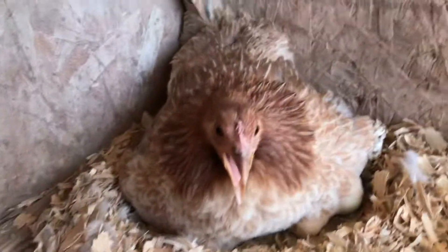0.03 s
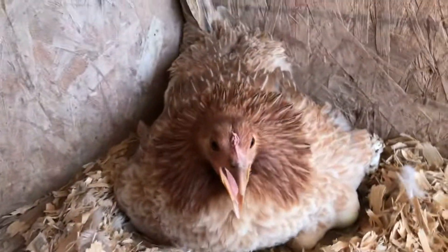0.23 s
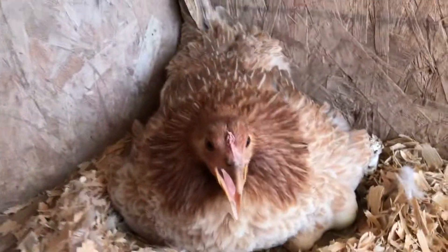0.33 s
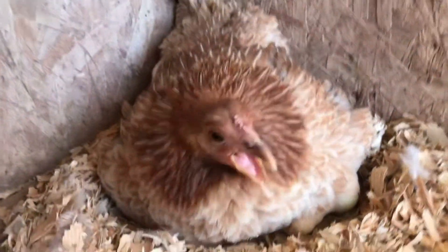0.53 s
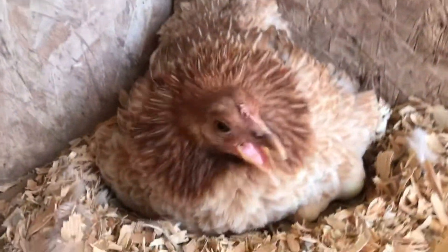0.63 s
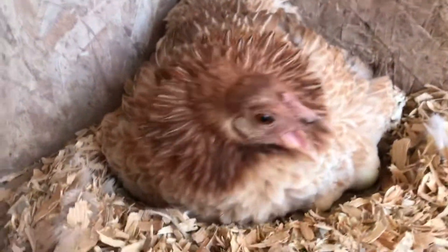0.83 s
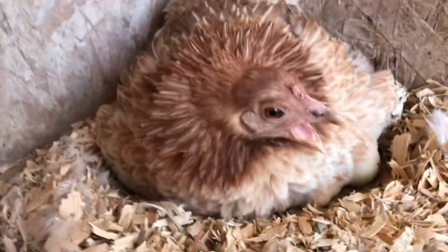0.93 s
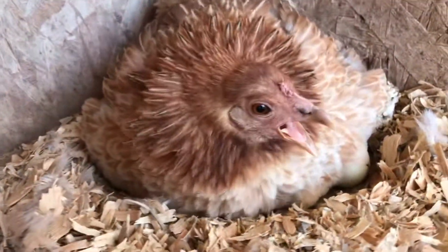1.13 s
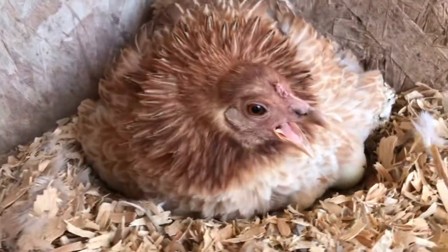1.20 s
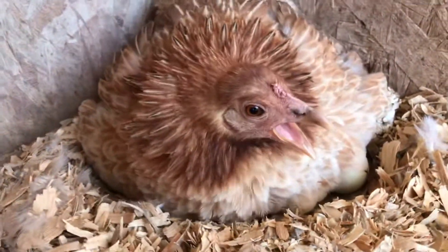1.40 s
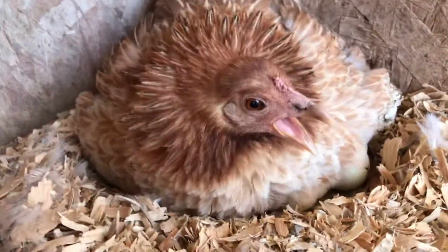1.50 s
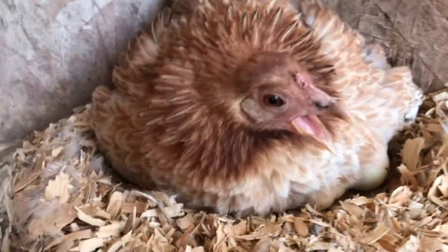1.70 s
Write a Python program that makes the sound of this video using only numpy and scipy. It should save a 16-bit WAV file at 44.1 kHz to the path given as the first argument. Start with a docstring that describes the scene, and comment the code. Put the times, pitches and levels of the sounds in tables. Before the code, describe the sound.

Close, slightly dull phone pickup of one hen in a wooden coop: a thin whine swells into a long cracked screech, a rough squawk bursts and wheezes out, then a low moan starts raspy and clears.

```python
"""A broody hen in a wooden nest box, close to a phone microphone, over the faint hush of the coop.
First a thin whine; from 0.22 s a long screech that breaks between clear whistle and rasp, with low croaks;
from 1.04 s a harsh squawk with a wheezy tail; from 1.37 s a softer low moan that starts raspy and clears.
The syrinx gives a stack of partials; where it turns chaotic they smear, and uneven pulses ring the throat.
The screech adds a growl near half pitch. Small ticks in the bedding and a short ring of the box surround it."""
import sys
import numpy as np
from scipy import signal
from scipy.fft import rfft, irfft
from scipy.io import wavfile
from scipy.ndimage import uniform_filter1d

SR = 44100
rng = np.random.default_rng(int(sys.argv[2]) if len(sys.argv) > 2 else 0)


def nominal_scale(level):
    """Amplitude ratio for a level in decibels (scalar or array-like)."""
    x = np.asarray(level, float) / 20
    return 10 ** x


def materialize(psi):
    """Save the field psi as 16-bit PCM at rate SR to the path in sys.argv[1].

    A 1-D psi becomes a single channel; in a 2-D psi each row is a channel.
    """
    bounded = np.clip(np.atleast_2d(psi).T, -1, 1)
    quanta = np.round(bounded * 32767).astype(np.int16)
    wavfile.write(sys.argv[1], SR, quanta)


N = 77175
T = np.arange(N) / SR


def follow(curve):
    """Straight lines through the (t/s, value) points of a curve, read at every sample."""
    t, value = np.array(curve).T
    return np.interp(T, t, value)


def band(x, hz, width_hz):
    """One resonance applied twice; width_hz is that of a single pass."""
    b, a = signal.iirpeak(hz, hz / width_hz, fs=SR)
    return signal.lfilter(b, a, signal.lfilter(b, a, x))


def unit(x):
    """Scale to rms 1."""
    return x / np.sqrt(np.mean(np.abs(x) ** 2))


def walk(rate_hz):
    """Smooth random wander of spread 1: noise kept below rate_hz."""
    sos = signal.butter(4, rate_hz, fs=SR, output="sos")
    settled = signal.sosfilt(sos, rng.standard_normal(2 * N))[N:]
    return unit(settled)


def hiss(hz, width_hz):
    """Air noise in one resonance, rms 1."""
    return unit(band(rng.standard_normal(N), hz, width_hz))


def grainy(curve, width_hz, steady):
    """A tone on a (t/s, f/Hz) curve whose size and phase tremble; rms 1."""
    turn = np.exp(2j * np.pi * np.cumsum(follow(curve)) / SR)
    tremble = (walk(width_hz) + 1j * walk(width_hz)) / 2
    return unit(np.imag((steady + tremble) * turn))


def controls(table):
    """Pitch and gains of one call for every sample; the gains are silent outside the call."""
    rows = np.array(table, float)
    t = rows[:, 0]
    inside = 1. * ((T >= t[0]) & (T <= t[-1]))
    inside = uniform_filter1d(inside, size=200, mode="nearest")
    pitch = np.interp(T, t, rows[:, 1])
    return pitch, [inside * nominal_scale(np.interp(T, t, column)) for column in rows.T[2:]]


# Chaos in the syrinx: t/s, roughness (0 clear, larger is more chaotic, up to 1.4)
ROUGHNESS = [(.1, .4), (.13, .5), (.19, .3), (.2, .1), (.235, .25), (.26, .6), (.275, .03), (.34, .03),
             (.355, .6), (.56, .6), (.58, .1), (.645, .08), (.66, .22), (.72, .3), (.73, .1), (.78, .38),
             (.86, .35), (.9, .2), (.93, .03), (1.04, .02), (1.05, .3), (1.07, .12), (1.095, .15),
             (1.11, 1.4), (1.4, 1.4), (1.44, .9), (1.453, .08), (1.475, .1), (1.49, .8), (1.535, .7),
             (1.55, .22), (1.735, .22), (1.745, .6)]


def roughness():
    """How chaotic the syrinx is at every sample."""
    return follow(ROUGHNESS)


SMEAR_HZ = 45  # rate of the smear, widened for higher partials
WAVER, FLUTTER_DB = .0015, 2.5  # rms pitch wander as a fraction; rms overtone flicker


def partials(pitch, pairs):
    """Partials (multiple, gain) of one oscillator; roughness trades each steady tone for a smeared one."""
    rough = roughness()
    phase = 2 * np.pi * np.cumsum(pitch * (1 + WAVER * walk(30))) / SR
    out = 0
    for k, gain in pairs:
        rate_hz = SMEAR_HZ * (1 + k / 3)
        smear = (walk(rate_hz) + 1j * walk(rate_hz)) / np.sqrt(2)
        share = np.clip(rough * (k / 2) ** .6, 0, 1)  # higher partials smear sooner
        flicker = nominal_scale(FLUTTER_DB * (k > 1) * walk(40))
        turn = (np.sqrt(1 - share ** 2) + share * smear) * np.exp(1j * k * phase)
        out = out + np.sqrt(2) * gain * flicker * np.imag(turn)
    return out


PULSE_JITTER, PULSE_SCATTER_DB = .25, 2  # spread of log spacing; spread of pulse level
BURST_HZ, BURST_DB = 70, 2.5  # rate and spread of the bursts


def rasp(gain, throat, rate_hz):
    """Uneven pulses, coming in bursts, ring the throat; rms 1 before the gain."""
    spacing, strength = rng.standard_normal((2, int(2 * rate_hz * N / SR)))
    at = np.cumsum(SR / rate_hz * np.exp(PULSE_JITTER * spacing)).astype(int)
    within = at < N
    pulses = np.zeros(N)
    pulses[at[within]] = nominal_scale(PULSE_SCATTER_DB * strength)[within]
    pulses = (pulses - pulses.mean()) * nominal_scale(BURST_DB * walk(BURST_HZ))

    def ring(x):
        """Throat resonances in parallel, with alternating sign."""
        out = 0
        for k, (hz, width_hz, db) in enumerate(throat):
            out = out + (-1) ** k * nominal_scale(db) * band(x, hz, width_hz) / np.sqrt(width_hz)
        return out

    return ring(pulses * gain) / np.std(ring(pulses))


# Spectrum of the coop's hush: f/Hz, relative level/dB
HUSH_SPECTRUM = [(35, -55), (70, -29), (200, -3), (500, -6), (1200, -9.5), (2500, -11), (6600, -15),
                 (7500, -27), (9750, -49), (16500, -120)]
HUSH_DB = -76  # rms level before a slow 1 dB drift


def hush():
    """Faint hush of the coop: noise shaped in frequency, drifting slowly in level."""
    f = np.maximum(np.arange(N // 2 + 1) * SR / N, 1)
    hz, db = np.array(HUSH_SPECTRUM).T
    shape = nominal_scale(np.interp(np.log(f), np.log(hz), db))
    noise = irfft(rfft(rng.standard_normal(N)) * shape, N)
    return unit(noise) * nominal_scale(HUSH_DB + walk(1.1))


# Thin whine: t/s, pitch f/Hz, level/dB of partials 1, 2, 4 and 6
WHINE_CALL = [(0.0, 846, -72, -73, -45.5, -86), (0.038, 852, -62, -86, -45, -77),
              (0.062, 846, -74, -76, -41, -82.5), (0.086, 878, -68.5, -78.5, -38, -75),
              (0.122, 871, -102, -80.5, -47, -78), (0.178, 919.6, -94.5, -74.5, -61.5, -65),
              (0.212, 892, -100, -91, -27, -91.5), (0.225, 855, -74, -60, -20, -63)]


def whine():
    """Thin opening whine of the syrinx, strongest on the fourth partial."""
    pitch, (first, second, fourth, sixth) = controls(WHINE_CALL)
    third, eighth = first * nominal_scale(-15.5), sixth * nominal_scale(-6.5)
    return partials(pitch, [(1, first), (2, second), (3, third), (4, fourth), (6, sixth), (8, eighth)])


# Small ticks in the bedding: t/s, starting level/dB, f/Hz
BEDDING_TICKS = [(0.119, -55, 7090), (0.128, -70, 237), (1.412, -49.5, 950), (1.42, -52.5, 905),
                 (1.449, -49, 152), (1.484, -51.5, 3660)]


def ticks():
    """Short damped sine clicks, decaying over 1.4 ms."""
    out = np.zeros(N)
    for s, db, hz in BEDDING_TICKS:
        age = np.maximum(T - s, 0)
        out += nominal_scale(db) * np.sin(2 * np.pi * hz * age) * np.exp(-age / 0.0014)
    return out


CATCH_HZ, CATCH_JITTER = 56, .35  # typical rate; spread of its logarithm


def catches():
    """0-1: brief, roughly regular moments when the membranes lose their beat."""
    beat = np.sin(2 * np.pi * np.cumsum(CATCH_HZ * np.exp(CATCH_JITTER * walk(25))) / SR)
    return 1 / (1 + np.exp(-7 * (beat + .35 * walk(30) - .35)))


# Long screech: t/s, pitch f/Hz, level/dB of partials 1, 2, 3 and 4, growl level/dB,
# rasp level/dB before roughness and catches scale it
SCREECH_CALL = [(0.221, 1146, -44.5, -57.5, -22.5, -75, -72, -33.5),
                (0.228, 1098, -22, -46.5, -55, -79, -53.5, -25),
                (0.25, 1049, -38.5, -75.5, -59.5, -73.5, -40, -29.5),
                (0.266, 1049, -52, -71, -71.5, -95.5, -68.5, -32.5),
                (0.277, 1035, -26, -70, -73, -65, -63, -33),
                (0.301, 1065, -27.5, -75, -44.5, -55.5, -69, -37.5),
                (0.325, 1110, -29, -53.5, -63.5, -64, -81.5, -52),
                (0.342, 1105, -28, -52, -45, -53, -72, -59),
                (0.355, 1110, -26, -72.5, -58.5, -95.5, -38.5, -35),
                (0.389, 1132, -28.5, -48.5, -40.5, -81.5, -47, -31.5),
                (0.501, 1153, -28, -57, -44.5, -72.5, -43, -31),
                (0.543, 1153, -33.5, -63, -33.5, -45, -50.5, -21.5),
                (0.571, 1168, -29.5, -70.5, -31, -45, -51, -26.5),
                (0.611, 1161, -28.5, -57.5, -29.5, -63.5, -75, -44.5),
                (0.623, 1250, -25, -37, -42.5, -53, -78, -51),
                (0.637, 1239, -21, -36, -34, -92, -83, -19.5),
                (0.653, 1241, -54, -52.5, -66, -82, -66, -39.5),
                (0.681, 1271, -24.5, -95, -80, -93, -66, -18),
                (0.722, 1250, -67, -86, -75, -90.5, -65.5, -48.5),
                (0.73, 1230, -27, -65, -54.5, -71.5, -50.5, -48),
                (0.765, 1179, -32, -67.5, -92, -87.5, -44, -50),
                (0.783, 1191, -31, -52.5, -32.5, -44, -75, -32.5),
                (0.809, 1155, -26.5, -64, -68, -50.5, -43, -34),
                (0.819, 1198, -29.5, -40.5, -46, -41, -54, -30),
                (0.857, 1152, -30.5, -35, -37, -54, -59, -36),
                (0.875, 1236, -32.5, -38.5, -26.5, -44.5, -87.5, -40),
                (0.901, 1230, -36, -43, -45, -74, -82, -42),
                (0.913, 1305, -34, -71.5, -71.5, -71, -90.5, -57),
                (0.933, 1332, -45, -69, -84, -83.5, -97, -80),
                (0.965, 1362, -31, -84.5, -74, -50.5, -94.5, -69),
                (0.99, 1376, -34.5, -73.5, -79.5, -56.5, -93.5, -73.5),
                (1.033, 1372, -34.5, -71.5, -85, -66.5, -92, -79),
                (1.047, 1373, -35.5, -68, -44, -60, -80, -35)]
# Throat resonances rung by its rasp: f/Hz, single-pass width/Hz, weight level/dB
SCREECH_RESONANCES = [(3398.5, 92, 7), (3694, 250, -2), (4149, 190, -8.5), (2464, 200, -16.5),
                      (950, 410, -9), (4270, 920, -26.5), (1670, 700, -33.5), (3256, 250, -5.5)]
# Steady growl near half the pitch: t/s, f/Hz
GROWL_CURVE = [(.245, 543), (.45, 575)]
# Single catches of the tone, each about 2 ms to either side: t/s, depth level/dB
TONE_BREAKS = [(.235, -5), (.743, -4), (0.771, -19), (.804, -24), (0.831, -9), (.874, -5)]
# Hiss past the beak: t/s, level/dB over the rasp
BEAK_HISS = [(.2, -43), (.6, -35.5), (.65, -59.5), (.76, -54), (.79, -20.5), (.88, -18), (.92, -31.5)]
CATCH_DB, CATCHES_END_S = -10, .6  # deepest catch of a rough tone; no regular catches after this time
OPEN_S, SHUT_S = 0.67, .9  # the beak opens wide between these times
AIR_DB = -38  # each band of air leaking around the tone, against partial 1


def screech():
    """The long call; when the tone catches, the growl runs on and the rasp swells."""
    pitch, (first, second, third, fourth, growl, grit) = controls(SCREECH_CALL)
    rough = roughness()
    caught = catches() * (T < CATCHES_END_S)
    held = nominal_scale(CATCH_DB * caught * np.clip(2.4 * rough - .2, 0, 1))
    held = held * nominal_scale(sum(db * np.exp(-((T - s) / 0.0022) ** 2) for s, db in TONE_BREAKS))
    opened = uniform_filter1d(1. * (T > OPEN_S) * (T < SHUT_S), size=400)
    fifth = np.sqrt(second * third) * nominal_scale(-30 + 21.4 * opened)  # stronger while the beak opens wide
    tones = partials(pitch, [(1, first * held), (2, second * held), (3, third),
                             (4, fourth * held), (5, fifth * held)])
    tones = tones + growl * grainy(GROWL_CURVE, width_hz=40, steady=.7)
    leak = first * nominal_scale(AIR_DB) * (hiss(1500, 500) + hiss(1900, 690))
    grit = grit * np.sqrt(rough) * nominal_scale(4.44 * caught + 1.0)
    beak = grit * nominal_scale(follow(BEAK_HISS)) * hiss(6450, 1100)
    return tones + leak + rasp(grit, SCREECH_RESONANCES, rate_hz=1100) + beak


# Low croaks where the voice breaks: t/s, length/s, level/dB at the height of the swell, f/Hz
CROAK_NOTES = [(0.662, 0.03, -36, 990), (0.667, 0.021, -45, 760), (0.698, 0.035, -47.5, 916),
               (1.15, 0.026, -45, 802)]


def croaks():
    """Short rough low notes, each a trembling tone under a half-sine swell."""
    out = 0
    for s, length, db, hz in CROAK_NOTES:
        swell = np.sin(np.pi * np.clip((T - s) / length, 0, 1))
        out = out + nominal_scale(db) * swell * grainy([(s, hz)], width_hz=50, steady=0.48)
    return out


# Harsh squawk: t/s, pitch f/Hz, level/dB of partials 1, 3 and 4,
# then level/dB of hiss, wheeze and rasp before their mixing factors
SQUAWK_CALL = [(1.035, 1264, -63, -86, -90.5, -64.5, -61, -73),
               (1.047, 1210, -43, -33, -75.5, -59.5, -50, -22),
               (1.057, 1139, -26.5, -44, -64, -49.5, -41.5, -19.5),
               (1.066, 1063, -30.5, -27.5, -39, -52.5, -57.5, -13.5),
               (1.079, 985.6, -22.5, -46, -15, -45, -44, -24),
               (1.097, 1004, -30, -54.5, -41, -44.5, -37.5, -18.5),
               (1.111, 1093, -39, -45.5, -50.5, -44, -54, -28.5),
               (1.129, 1128, -34, -48, -49.5, -40, -45.5, -39),
               (1.139, 1031, -43, -43, -52, -49.5, -54.5, -35.5),
               (1.149, 901, -63, -78, -50, -58, -59, -63), (1.162, 821, -40.5, -57, -53, -98, -60, -50),
               (1.187, 695, -68.5, -87.5, -101, -83, -65, -79),
               (1.239, 733, -85.5, -94.5, -100.5, -74.5, -55.5, -88),
               (1.313, 872, -84.5, -106, -97, -100, -73.5, -104.5)]
# Throat resonances rung by its rasp: f/Hz, single-pass width/Hz, weight level/dB
SQUAWK_RESONANCES = [(3400, 100, 8), (4005, 147.3, -7), (640, 250, -22), (3890, 200, 3.5),
                     (3162, 130, -1.5), (2471, 50, -12.5), (1036.3, 510, -13.5), (6347, 340, -10),
                     (1950, 390, -19)]
# Air in the windpipe, sagging after the squawk: t/s, f/Hz
WHEEZE_CURVE = [(1.2, 1492), (1.31, 1278)]


def squawk():
    """Loud harsh burst whose pitch falls unevenly, its tone dissolving into breath, then a wheeze."""
    pitch, (first, third, fourth, spit, air, grit) = controls(SQUAWK_CALL)
    wheeze = grainy(WHEEZE_CURVE, width_hz=54, steady=0) + 0.47 * hiss(1200, 490)
    spray = hiss(4900, 1100) + nominal_scale(-8.0) * hiss(6880, 480) + nominal_scale(-3) * hiss(1800, 1397)
    broken = np.clip(roughness() - .4, 0, .8)  # the tone dissolves into breathy noise
    tone = first * np.sqrt(1 - broken ** 2)
    breath = first * broken * hiss(1080, 450)
    tones = partials(pitch, [(1, tone), (1.5, tone * nominal_scale(-26)), (3, third), (4, fourth)])
    harsh = rasp(grit * nominal_scale(-0.5), SQUAWK_RESONANCES, rate_hz=1600)
    return tones + air * wheeze + spit * spray + breath + harsh


# Soft moan: t/s, pitch f/Hz, level/dB of partials 1, 2, 3 and 5 (6 and 7 share the last),
# low tone level/dB, rasp level/dB
MOAN_CALL = [(1.37, 736.4, -87.5, -82, -100, -89, -87, -73.5),
             (1.396, 745.3, -75, -68, -87.5, -103, -96, -77.5),
             (1.416, 794.6, -61.5, -102.5, -93.5, -80, -81.5, -68),
             (1.426, 752.5, -113, -104.5, -93.5, -82, -99, -103.5),
             (1.446, 761, -84.5, -63.5, -100, -90.5, -88, -43),
             (1.456, 805, -44.5, -46, -68, -73, -61, -48.5), (1.47, 786, -47, -44.5, -75.5, -99, -74, -69),
             (1.48, 750.5, -86, -54.5, -85.5, -73, -86, -49),
             (1.498, 769.4, -67, -53, -101, -86.5, -51.5, -45.5),
             (1.506, 720, -49, -59, -83.5, -79, -52, -42.5),
             (1.522, 850, -59.5, -48, -88.5, -85, -51.5, -45.5),
             (1.54, 852.4, -42, -49, -72, -79, -63, -47.5),
             (1.562, 835, -53.5, -51.5, -75.5, -81, -72, -102),
             (1.598, 842, -49, -56.5, -70.5, -85, -92, -83),
             (1.62, 838, -48, -53.5, -61.5, -79, -82.5, -81.5),
             (1.674, 823, -47, -55, -74, -78.5, -96, -81), (1.722, 829, -48, -51, -71, -79, -93.5, -89),
             (1.728, 798, -45, -52, -62.5, -75.5, -99, -58), (1.75, 850, -65, -58, -75.5, -85.5, -82, -41)]
# Throat resonances rung by its rasp: f/Hz, single-pass width/Hz, weight level/dB
MOAN_RESONANCES = [(1250, 260, 10.5), (1710, 860, -15), (778, 150, 2), (2920, 990, -16.5),
                   (5500, 4100, -25)]
LOW_HZ = 539.5  # low tone under the raspy start


def moan():
    """Soft low call of the syrinx that starts raspy, over a low tone, and clears."""
    pitch, (first, second, third, upper, low, grit) = controls(MOAN_CALL)
    tones = partials(pitch, [(1, first), (2, second), (3, third), (5, upper), (6, upper), (7, upper)])
    tones = tones + low * grainy([(0, LOW_HZ)], width_hz=40, steady=1)
    return tones + rasp(grit, MOAN_RESONANCES, rate_hz=300)


BOX_T60_S, BOX_DB = .1, -24  # time to decay by 60 dB; level of the ring against the hen


def nest_box(hen):
    """Short ring of the wooden box: decaying noise that begins 2 ms after the direct sound."""
    age = T[:SR // 4]
    tail = rng.standard_normal(len(age)) * np.exp(-np.log(1000) * age / BOX_T60_S) * (age > .002)
    tail = tail / np.sqrt(np.sum(tail ** 2))
    return nominal_scale(BOX_DB) * signal.fftconvolve(hen, tail)[:N]


RUMBLE_DB, RUMBLE_HZ = -46, 292  # level against the voice's envelope; upper limit


def rumble(hen):
    """A low rumble that follows the loudness of the voice."""
    envelope = uniform_filter1d(np.abs(hen), size=400)
    return nominal_scale(RUMBLE_DB) * envelope * walk(RUMBLE_HZ)


def scene():
    """The hen and her bedding close by, the ring of the box, the rumble and the hush of the coop."""
    hen = whine() + ticks() + screech() + croaks() + squawk() + moan()
    return (hush() + hen + nest_box(hen) + rumble(hen))[None]


def band_limit(x):
    """A steep low-pass at the top of the band."""
    return signal.sosfilt(signal.butter(12, 7650, fs=SR, output="sos"), x)


BEND = 0.019  # slight squared distortion that adds faint lows and overtones to the loud voice
TOP_HZ = 7450  # upper edge of the phone channel


def record(dry):
    """The phone's pickup: slight distortion, then a narrow-band channel."""
    square = dry ** 2
    bent = dry + BEND * (square - uniform_filter1d(square, size=3000))
    low_pass = signal.ellip(10, .3, 60, TOP_HZ, fs=SR, output="sos")
    return band_limit(signal.sosfilt(low_pass, bent))


dry = scene()
out = record(dry)
materialize(out)
```